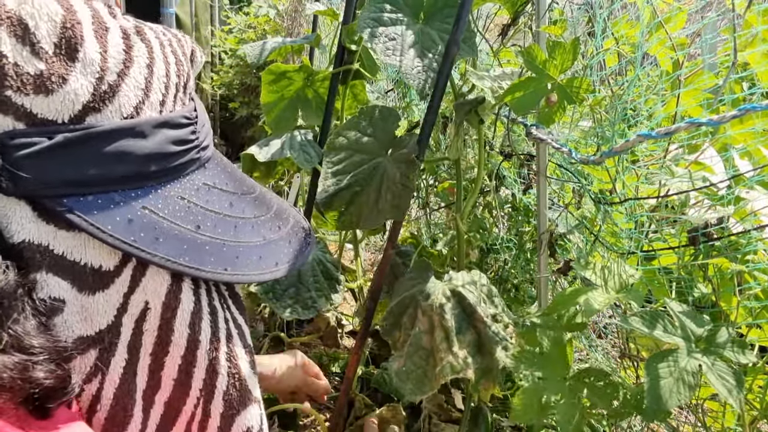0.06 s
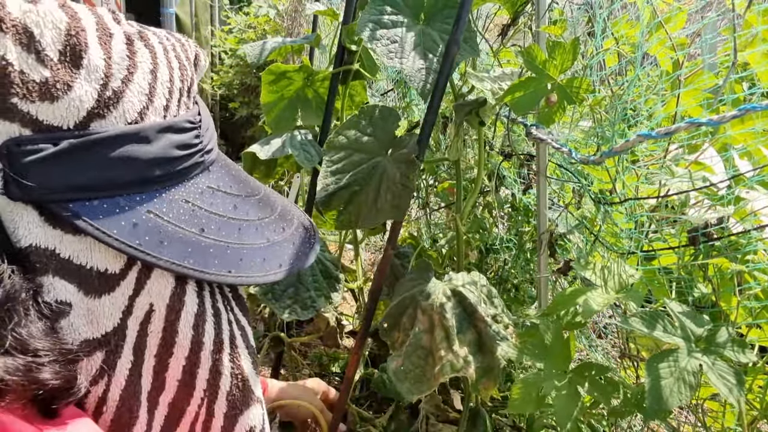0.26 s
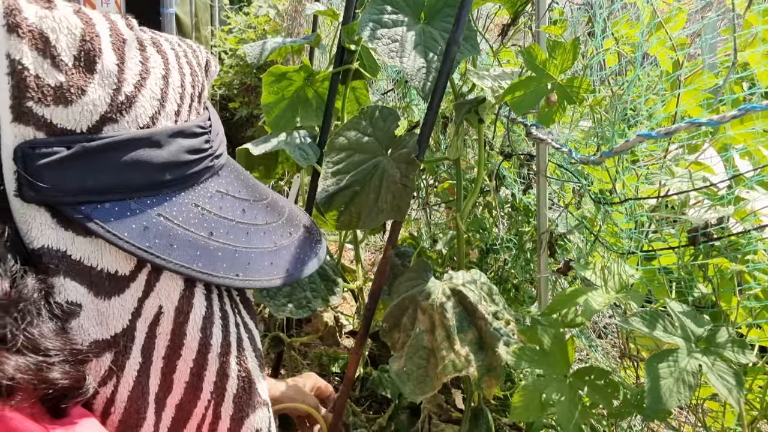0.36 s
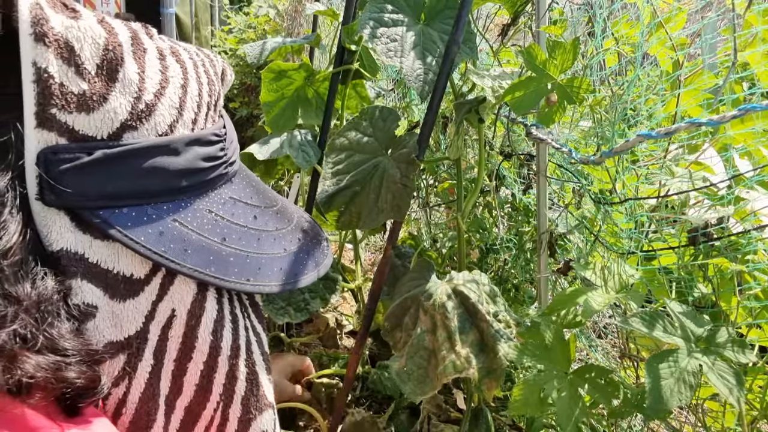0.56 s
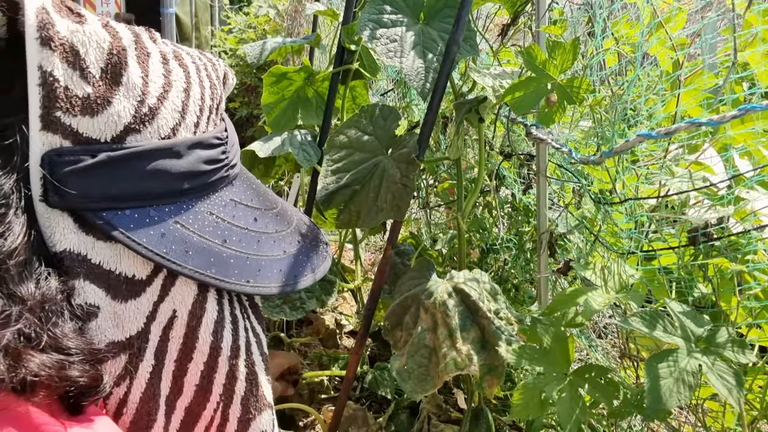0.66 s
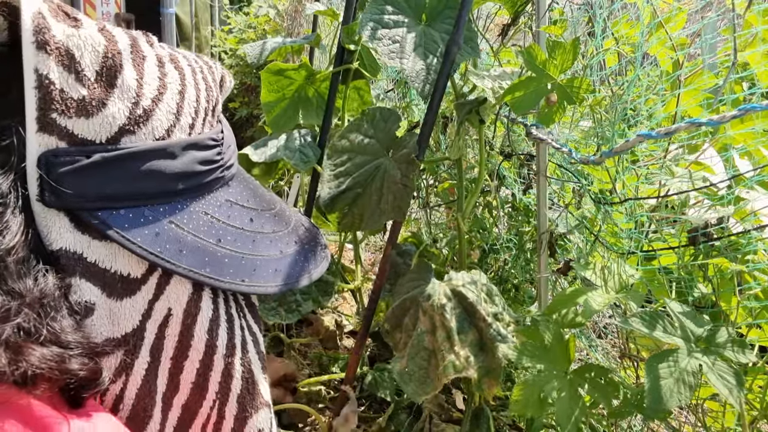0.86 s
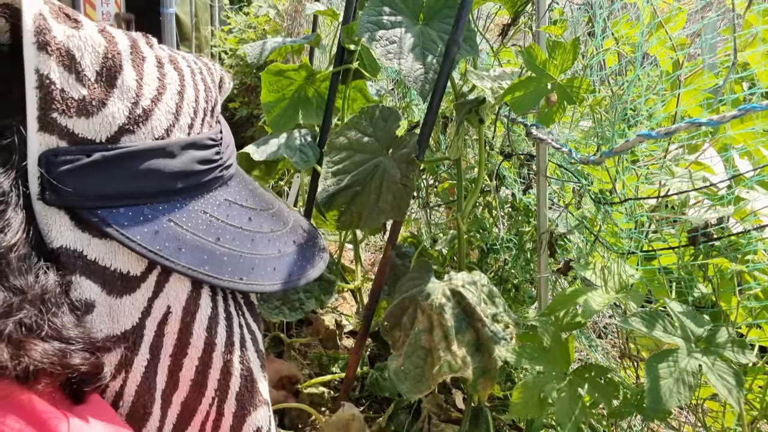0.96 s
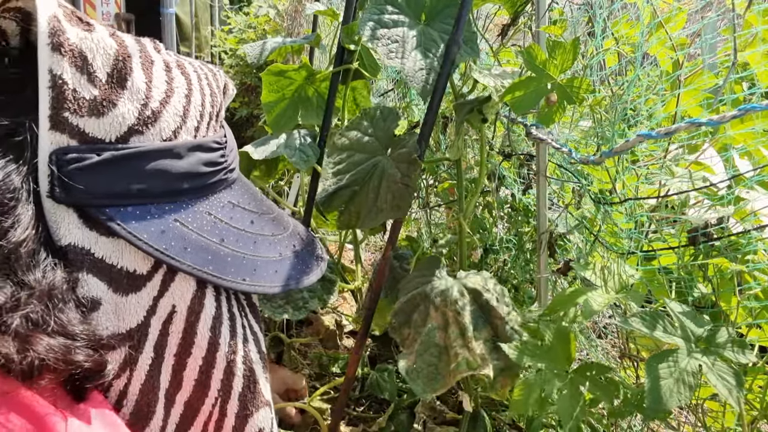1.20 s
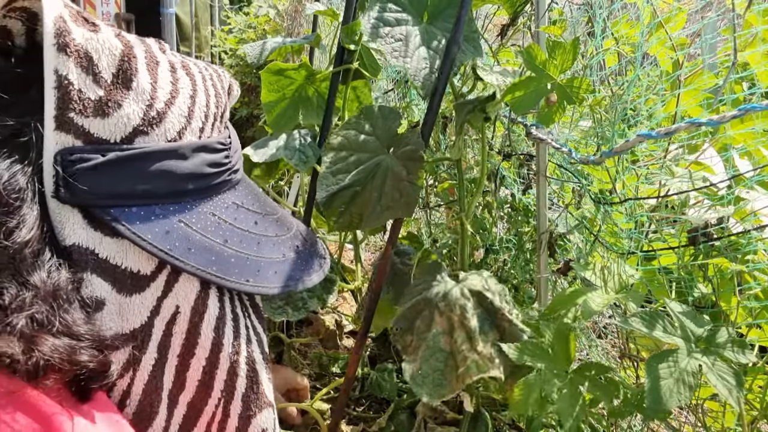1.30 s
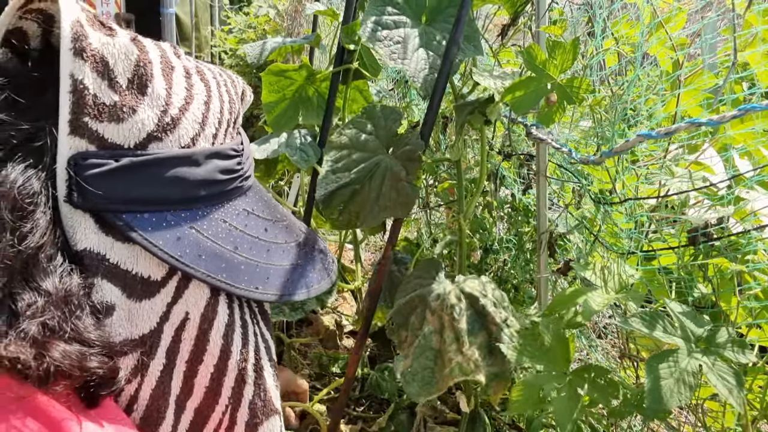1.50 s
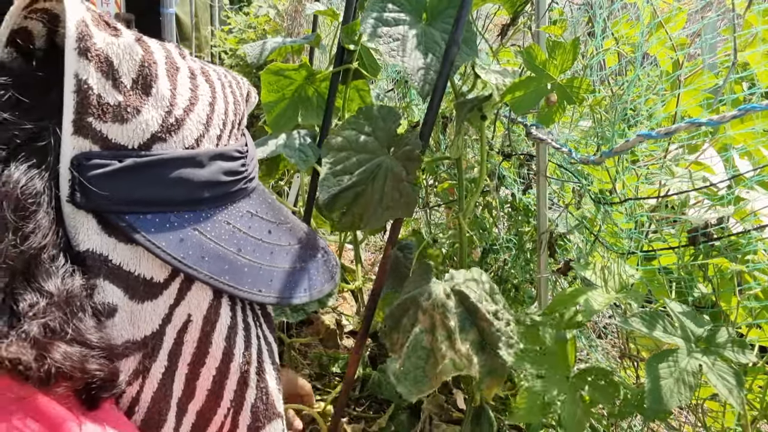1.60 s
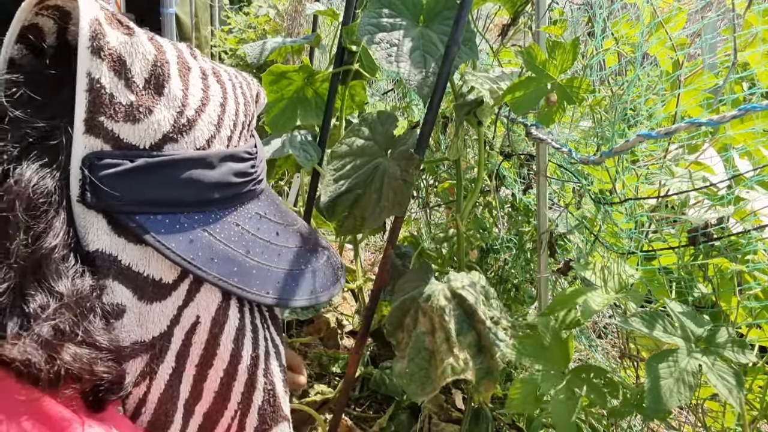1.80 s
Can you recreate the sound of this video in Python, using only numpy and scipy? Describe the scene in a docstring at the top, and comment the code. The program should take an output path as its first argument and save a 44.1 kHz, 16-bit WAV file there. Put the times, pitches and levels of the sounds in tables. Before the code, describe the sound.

Dry vine leaves rustle and crackle close by in a garden. Only low wind rumble and faint hiss until 0.23 s, then a dense crunchy pull with stem snaps, loudest around 0.36-0.4 s. Shorter scrapes follow at 0.6, 0.73 and 0.9 s, with a near lull around 1.0-1.2 s. Another crackling burst comes at 1.24-1.35 s, a snap at 1.54 s, then light rustles and tiny squeaks fade out.

```python
"""Dry hairy leaves scrape and crackle close by as a hand pulls vines down in a garden.
The crackle is thousands of tiny leaf grains, opened and closed by strokes of the pull.
Stems snap as short rings under broad cracks, and sliding stems squeak as narrow friction noise.
A low wind rumble of shaped noise and a faint steady garden hiss lie under it all, in stereo."""
import sys
import numpy as np
from scipy import signal
from scipy.fft import rfft, irfft
from scipy.io import wavfile
from scipy.ndimage import uniform_filter1d

SR = 44100
rng = np.random.default_rng(int(sys.argv[2]) if len(sys.argv) > 2 else 0)


def digitize_waveform(pressure):
    """Quantize a signal to 16-bit integers and store it at the path in sys.argv[1].

    Rows of a 2-D input are taken as channels; values are limited to [-1, 1].
    """
    field = np.atleast_2d(pressure).T
    bounded = np.clip(field, -1, 1)
    quanta = np.round(bounded * 32767).astype(np.int16)
    wavfile.write(sys.argv[1], SR, quanta)


N = 81585  # length in samples

# colour of rumble and hiss together: f/Hz, level/dB
AIR_COLOUR = [(22, -50), (48, -18), (60, 1.5), (84, -0.5), (100, -10), (125, -13), (150, -15), (344, -27.5),
              (1440, -33.5), (4300, -44), (6000, -49.5), (16000, -64)]
# left-right likeness of the air: f/Hz, likeness (0 to 1)
AIR_LIKENESS = [(60, 1), (290, 0.86), (640, 0.19), (1400, 0)]
# wind swells, a gain ride on the evened rumble: t/s, level/dB
WIND_SWELLS = [(0, -52.5), (.25, -53.5), (.33, -57.5), (.6, -57.5), (.74, -53.5), (1.0, -57.5),
               (1.082, -51.5), (1.4, -56.5), (1.62, -52), (1.75, -58)]
RUMBLE_TOP_HZ = 126  # crossover from rumble to hiss
HISS_DB = -53.5  # gain on the hiss, set against the raw rumble

# colour of the leaf crackle, also used for the snap cracks: f/Hz, level/dB
LEAF_COLOUR = [(180, -27), (400, -25), (1000, -16), (1840, -11), (2600, -6.5), (3240, -2.5), (4100, -8),
               (5200, -4), (6500, -2), (8000, -8.5), (10000, -19), (12500, -15), (16000, -15)]
# left-right likeness of leaves and stems: f/Hz, likeness (0 to 1)
LEAF_LIKENESS = [(500, .6), (1200, .93), (5000, .6), (12000, .28)]
# left over right balance of leaves and stems: f/Hz, level/dB
LEAF_BALANCE = [(2500, -.5), (7000, 3.2), (10000, -1), (13000, -4)]
PORT_LAG_S = 5.4e-5  # shared sound reaches the right port this much later

GRAINS_PER_S, GRAIN_SPREAD_DB = 4000, 2.3  # density; mean lift of the random grain sizes, before a cap
SCRAPE_T60_S, RING_CYCLES, RING_DB = 0.007, 10.2, 1  # ring falls by e squared in RING_CYCLES
TINT_DB, PATCH_DB = 3, 0.5  # RMS depth of narrow leaf resonances, then of quicker patches
TICK_SHARE, TICK_DB = 0.12, 5.5  # share of moments with a bright flick; mean lift before a cap
BODY_HZ, FIZZ_HZ, FIZZ_STEEPNESS = 4500, 9000, 8  # top of the body, bottom of the fizz

# strokes of leaves dragged past each other:
# start t/s, fullest t/s, end t/s, level/dB, body level/dB below BODY_HZ, fizz level/dB above FIZZ_HZ
# (an end ahead of the fullest moment drops at once to the tail)
STROKES = [(0.235, 0.275, 0.33, -42, 6, 4.5), (0.332, 0.383, 0.45, -35.5, 4, 5.5),
           (0.42, 0.463, 0.41, -49.5, 8.5, -3), (0.486, 0.512, 0.512, -50.5, 6.5, -1),
           (0.511, 0.587, 0.63, -43.5, 3, 1.5), (0.64, 0.643, 0.67, -50, 6.5, 4),
           (0.648, 0.707, 0.91, -56.5, 5, 6), (0.703, 0.728, 0.77, -40.5, -6.5, 2),
           (0.801, 0.824, 0.835, -46, -0.5, 6.5), (0.826, 0.932, 0.96, -47.5, 1, 7),
           (1.121, 1.16, 1.14, -54.5, 3, 2.5), (1.207, 1.245, 1.31, -42.5, -2.5, 1),
           (1.283, 1.303, 1.333, -39, 2, 7.5), (1.318, 1.345, 1.359, -41, 5, 6),
           (1.369, 1.394, 1.397, -48.5, 0.5, -14), (1.465, 1.504, 1.505, -49, 5, 11.5),
           (1.525, 1.535, 1.595, -47.5, 2.5, 5), (1.65, 1.669, 1.68, -49.5, -1.5, 5.5),
           (1.679, 1.737, 1.783, -50, 1, 0.5), (1.758, 1.78, 1.824, -49.5, -8.5, -1.5)]
STROKE_EDGE_DB, STROKE_SHAPE = -12, 2.3  # level at start and end; curve of the swell
STROKE_TAIL_DB, STROKE_TAIL_DB_PER_S = -17, -250  # leaves settle after each stroke
STIR_START_S, STIR_DB, STIR_FIZZ_DB = 0.2215, -64, 2  # faint stirring under the strokes

# single snaps of stems and leaf veins: t/s, peak level/dB ahead of the stereo ports, ring f/Hz
SNAPS = [(.229, -37.5, 2690), (0.2368, -30.5, 2700), (0.2438, -29, 2670), (0.264, -25, 3020),
         (0.294, -24.5, 2870), (.343, -26, 3270), (0.3616, -18.5, 2860), (0.374, -22, 3130),
         (0.3821, -25.5, 3100), (0.389, -27.5, 6470), (0.4044, -24, 3230), (0.4156, -25, 5250),
         (0.4445, -25, 3000), (.5296, -33.5, 6200), (0.567, -29.5, 2060), (0.6425, -26.5, 4830),
         (.6728, -40, 2510), (0.7296, -30, 6350), (.8104, -34, 5640), (0.821, -31.5, 3020),
         (0.9127, -32, 6330), (0.9932, -36.5, 4260), (1.0954, -37, 4150), (1.2092, -36, 3480),
         (1.2185, -35, 2750), (1.2429, -24.5, 3680), (1.2619, -31, 2650), (1.309, -34, 3700),
         (1.3284, -31, 3430), (1.3409, -23, 3360), (1.3875, -27.5, 3240), (1.478, -35, 5980),
         (1.4883, -33.5, 3390), (1.4998, -32, 3582), (1.5377, -22.5, 2650), (1.5725, -32, 7430),
         (1.731, -38, 2790)]
# modes of a snapping stem: frequency ratio to the ring, level/dB
SNAP_MODES = [(1, 0), (1.27, -2), (1.53, -3)]
SNAP_T60_S, CRACK_T60_S, SNAP_RISE_S = 0.012, 0.013, 0.0005
CRACK_DB = -1  # crack peak against the first ring mode
CRACK_BRIGHT_DB = 4.5  # lift per octave, easing off towards the lows

# a stem slides and sings briefly: start t/s, length t/s, pitch f/Hz, level/dB before the swell
SQUEAKS = [(0.451, 0.014, 2547, -41), (1.156, 0.034, 2320, -59.5), (1.283, 0.018, 4010, -42.5),
           (1.417, .040, 2630, -59.5), (1.728, 0.015, 2874, -49)]
SQUEAK_WIDTH_HZ = 250

EDGE_HZ = 15950  # top of the final band


def gain_of(db):
    """Turns decibels into an amplitude factor."""
    return 10 ** (np.asarray(db) / 20)


def evened(x):
    """Scales a signal to an RMS of one."""
    return x / np.sqrt(np.mean(abs(x) ** 2) + 1e-20)


def read(points, hz):
    """Reads a curve between its points along a logarithmic frequency axis."""
    f, value = np.transpose(points)
    return np.interp(np.log(hz + 1), np.log(f + 1), value)


def air():
    """Wind rumble as low noise that swells and dips, over a faint steady hiss of the garden."""
    frames, hz = N // 512 + 5, np.fft.rfftfreq(2048, 1 / SR)
    a, b, c, d = rng.standard_normal((frames, 1025, 4)).T
    same = np.clip(read(AIR_LIKENESS, hz), -1, 1)[:, None]
    left, other = a + 1j * b, c + 1j * d
    right = same * left + np.sqrt(1 - same ** 2) * other
    z = np.array([left, right]) * gain_of(read(AIR_COLOUR, hz))[:, None]
    low = 1 / (1 + (hz / RUMBLE_TOP_HZ) ** 4)[:, None]
    rumble, hiss = (signal.istft(z * w, nperseg=2048, noverlap=1536)[1][:, :N] for w in (low, 1 - low))
    scale = np.sqrt(np.mean(rumble ** 2))
    # partly level out the noise's own lumps so the swells lead
    power = uniform_filter1d((rumble ** 2).mean(0), size=3000)
    steady = rumble / np.sqrt(power + 0.22 * scale ** 2)
    swell_db = np.interp(np.arange(N) / SR, *np.transpose(WIND_SWELLS))
    return steady * gain_of(swell_db) + gain_of(HISS_DB) * hiss / scale


def ports(z, other, hz):
    """Two microphone ports: partly alike, the left one leading, each with its own colour."""
    same = np.clip(read(LEAF_LIKENESS, hz), 0, 1)
    tilt = gain_of(read(LEAF_BALANCE, hz) / 2)  # half the balance on each side
    lag = np.exp(-2j * np.pi * hz * PORT_LAG_S)
    right = same * z * lag + np.sqrt(1 - same ** 2) * other
    return np.array([z * tilt, right / tilt])


def colour(pair):
    """Flattens the spectra of a pair of grain trains, gives them leaf colour and spreads them in stereo."""
    hz, z = np.fft.rfftfreq(N, 1 / SR), rfft(pair)
    z = z / np.sqrt(uniform_filter1d(abs(z) ** 2, size=1500, axis=1))
    return irfft(ports(*z, hz) * gain_of(read(LEAF_COLOUR, hz)), N)


def patches(shape, bins, frames):
    """Random hills and hollows over frequency and time."""
    smooth = uniform_filter1d(rng.standard_normal(shape), bins, axis=0)
    return evened(uniform_filter1d(smooth, frames, axis=1))


def strokes(hz, t):
    """Gain over frequency and time: strokes swell and fade with their own body and fizz, over faint stirring."""
    body = 1 / (1 + (hz / BODY_HZ) ** 6)
    fizz = 1 - 1 / (1 + (hz / FIZZ_HZ) ** FIZZ_STEEPNESS)
    power = np.outer(gain_of(STIR_DB + STIR_FIZZ_DB * fizz) ** 2, t > STIR_START_S)
    for start, full, end, level_db, body_db, fizz_db in STROKES:
        # 0 at the fullest moment, 1 at the start and the end
        before = (full - t) / max(full - start, 1e-3)
        after = (t - full) / max(end - full, 1e-3)
        away = np.where(t < full, before, after)
        tail_db = np.where(t > full, STROKE_TAIL_DB + STROKE_TAIL_DB_PER_S * (t - end), -150)
        tail_db = np.minimum(tail_db, STROKE_TAIL_DB)
        swell_db = np.maximum(STROKE_EDGE_DB * away ** STROKE_SHAPE, tail_db)
        colour_db = (body * body_db + fizz * fizz_db)[:, None]
        power = power + gain_of(level_db + colour_db + swell_db) ** 2
    return np.sqrt(power) * (t > STIR_START_S)


def crackle():
    """Thousands of tiny grains, each a short scrape plus a brief ring of one leaf patch, shaped by strokes."""
    size = gain_of(GRAIN_SPREAD_DB * np.minimum(rng.exponential(1, N), 5))
    size *= rng.random(N) < GRAINS_PER_S / SR
    kind, t, pair = rng.integers(0, 80, N), np.arange(400) / SR, np.zeros((2, N))
    for k, hz in enumerate(np.geomspace(1500, 15000, num=80)):
        scrape = rng.standard_normal((2, len(t))) * gain_of(-60 * t / SCRAPE_T60_S)
        ring = np.sin(2 * np.pi * (hz * t + rng.random((2, 1)))) * np.exp(-hz * t / RING_CYCLES * 2)
        grain = scrape + gain_of(RING_DB) * ring
        pair += signal.oaconvolve((size * (kind == k))[None], grain)[:, :N]
    # narrow leaf resonances come and go
    z = signal.stft(colour(pair), nperseg=512)[2]
    tint_db = TINT_DB * patches(z.shape[1:], bins=3, frames=4)
    tinted = signal.istft(z * gain_of(tint_db), nperseg=512)[1]
    # dry leaf edges flick, brightest in the fizz
    hz, t, z = signal.stft(evened(tinted), SR, nperseg=128)
    ticks = (rng.random(len(t)) < TICK_SHARE) * np.minimum(rng.exponential(1, len(t)), 2)
    flick_db = TICK_DB * np.outer(np.minimum(hz / FIZZ_HZ, 1), ticks)
    patch_db = PATCH_DB * patches(z.shape[1:], bins=4, frames=3)
    shaped = z * strokes(hz, t) * gain_of(flick_db + patch_db)
    return signal.istft(shaped, SR, nperseg=128)[1][:, :N]


def snaps():
    """Each snap of a stem or vein is a short ring of a few modes with a broad noise crack."""
    t, pair = np.arange(1024) / SR, np.zeros((2, N + 1024))
    hz = np.fft.rfftfreq(len(t), 1 / SR)
    crack_db = read(LEAF_COLOUR, hz) + CRACK_BRIGHT_DB * np.log2(hz / BODY_HZ + 0.57)
    noises = rng.standard_normal((len(SNAPS), 2, len(t)))
    for (start, peak_db, ring_hz), noise in zip(SNAPS, noises):
        burst = noise * gain_of(-60 * t / CRACK_T60_S)
        crack = irfft(rfft(burst) * gain_of(crack_db))
        turns = 2 * np.pi * ring_hz * t + np.array([[0], [1]])  # channels start at different phases
        ring = sum(gain_of(db) * np.sin(ratio * turns) for ratio, db in SNAP_MODES)
        ring = ring * gain_of(-60 * t / SNAP_T60_S)
        both = ring + gain_of(CRACK_DB) * crack / abs(crack).max()
        both = both * np.minimum(t / SNAP_RISE_S, 1)
        pair[:, round(start * SR):][:, :len(t)] += gain_of(peak_db) * both / abs(both).max()
    return irfft(ports(*rfft(pair[:, :N]), np.fft.rfftfreq(N, 1 / SR)), N)


def squeaks():
    """Sliding stems sing as narrow bands of friction noise under a quick swell."""
    pair = np.zeros((2, N))
    smooth = signal.butter(2, SQUEAK_WIDTH_HZ / SR)  # low-pass at half the width
    noises = rng.standard_normal((len(SQUEAKS), 4, 4096))
    for (start, length, hz, level_db), noise in zip(SQUEAKS, noises):
        t = np.arange(round(length * SR)) / SR
        slow = signal.lfilter(*smooth, noise[:2] + 1j * noise[2:])[:, -len(t):]
        tone = evened((slow * np.exp(2j * np.pi * hz * t)).real)  # slow noise moved up to the pitch
        swell = np.sqrt(np.sin(np.pi * t / length))
        pair[:, round(start * SR):][:, :len(t)] += gain_of(level_db) * tone * swell
    return irfft(ports(*rfft(pair), np.fft.rfftfreq(N, 1 / SR)), N)


def scene():
    """Mixes crackling leaves, snaps and squeaks with the wind and hiss."""
    return crackle() + snaps() + squeaks() + air()


def record(dry):
    """Limits the band with a steep low-pass that keeps the timing."""
    low_pass = signal.firwin(511, EDGE_HZ, window=("kaiser", 9), fs=SR)
    return signal.oaconvolve(dry, low_pass[None], "same")


dry = scene()
out = record(dry)
digitize_waveform(out)
```